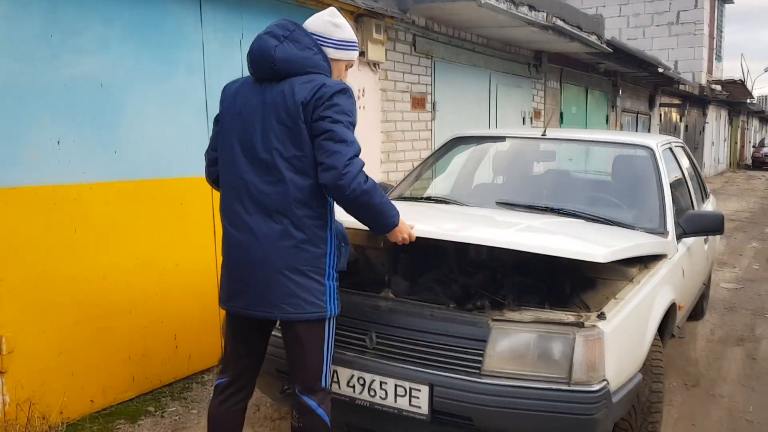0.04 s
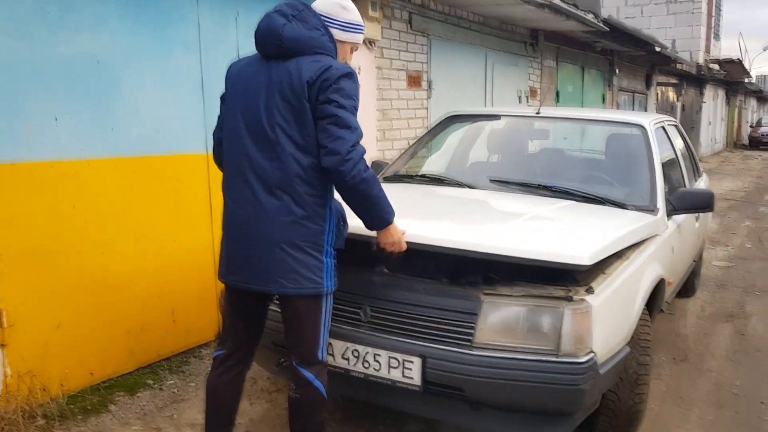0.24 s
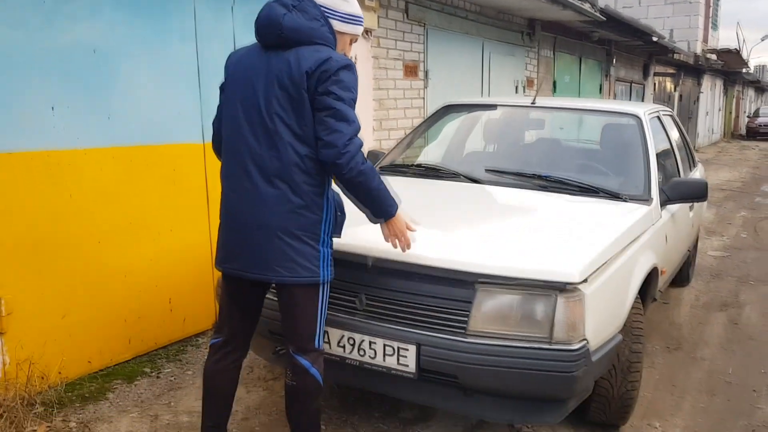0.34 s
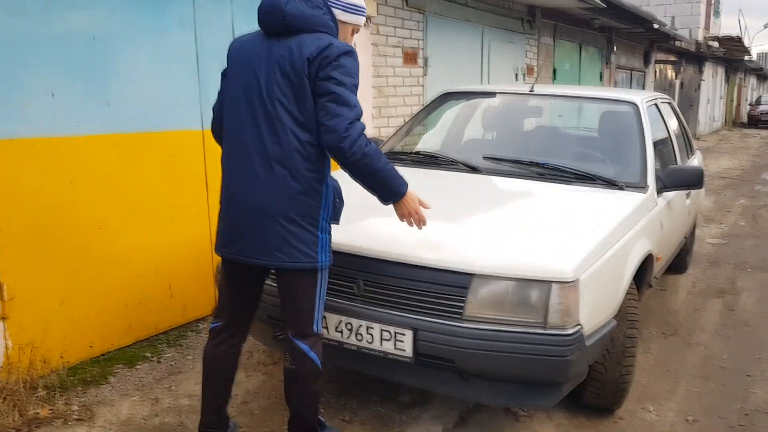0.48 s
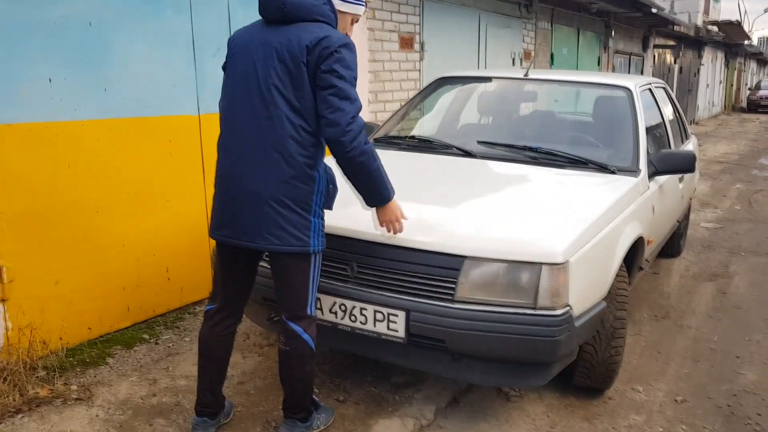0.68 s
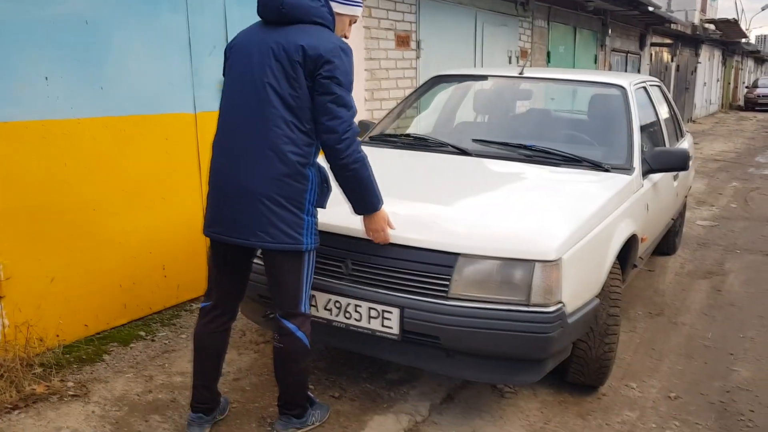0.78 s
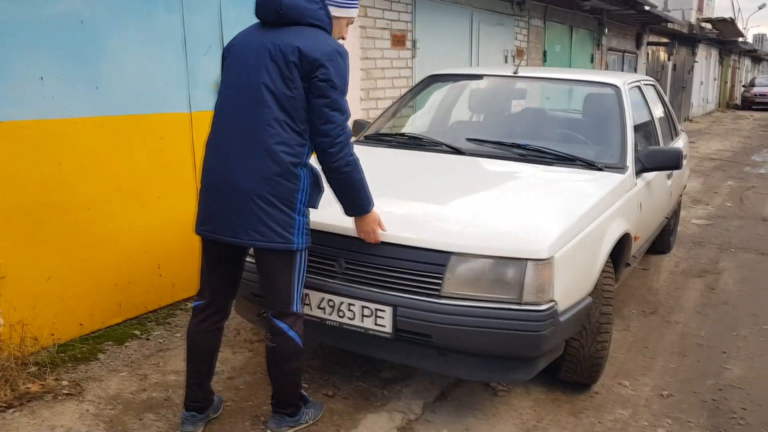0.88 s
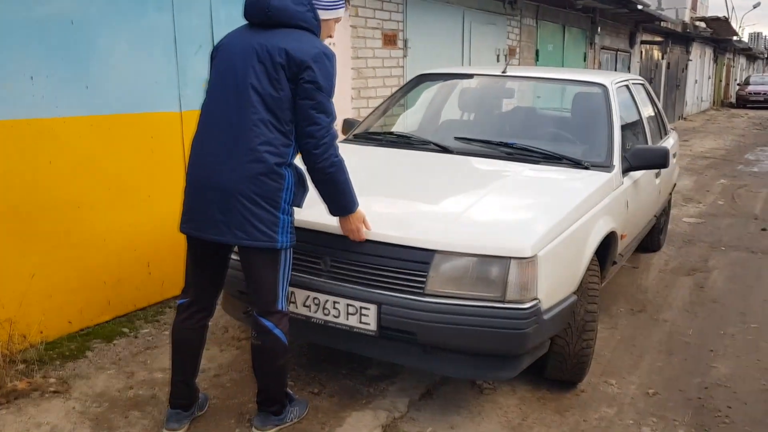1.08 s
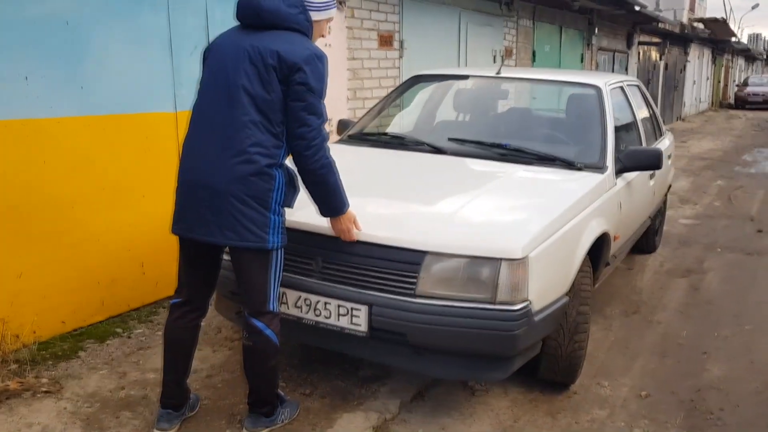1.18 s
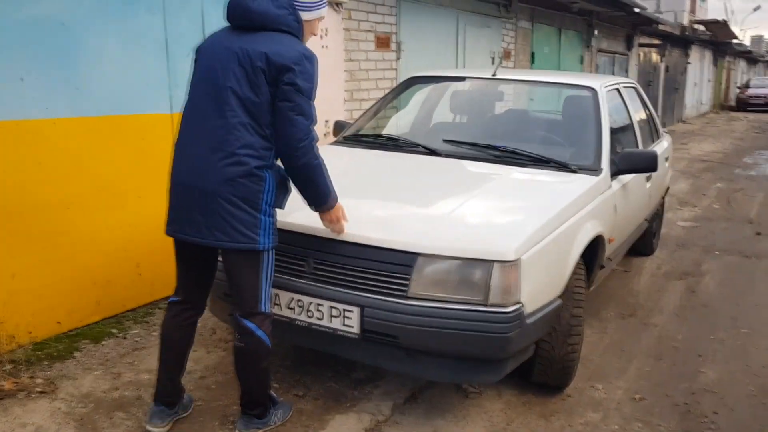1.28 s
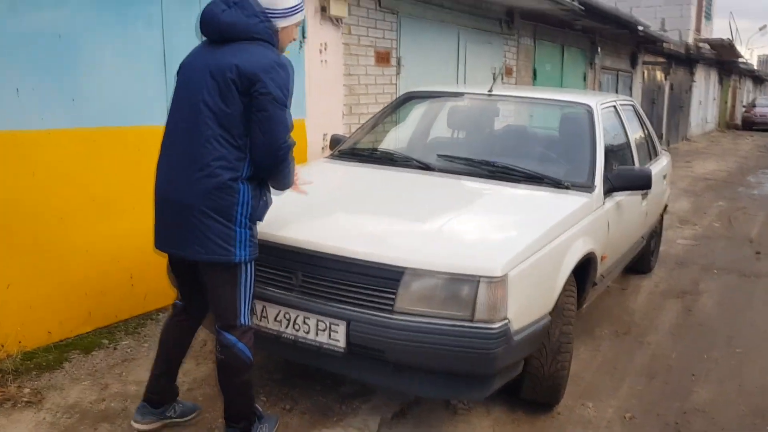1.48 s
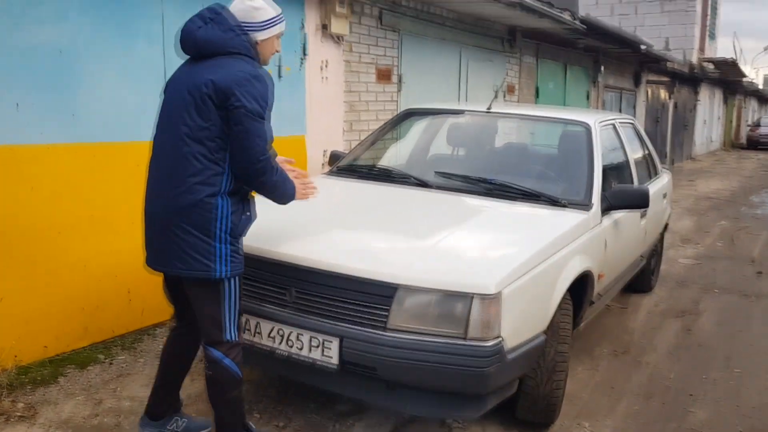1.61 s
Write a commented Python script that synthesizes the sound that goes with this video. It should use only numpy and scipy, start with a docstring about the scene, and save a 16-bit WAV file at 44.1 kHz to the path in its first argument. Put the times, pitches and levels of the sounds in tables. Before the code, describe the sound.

A car hood slams shut outdoors with a metallic clank and a deep, hollow boom

```python
"""Car hood dropped shut

A car hood drops shut in a lane between garage walls. The latch clanks as swelling modes, the rim rattles on
its stops as gritty noise bursts, panel, engine bay and sheet boom as decaying modes, walls add a noise tail.
Before it a gust buffets the microphone ports (lumpy low noise, low swings) and the hinge scrapes faintly (modes
rung by slips). Three soft low thuds (swings too) and a few small ticks follow, over noise as town rumble and hiss."""
import sys
import numpy as np
from scipy import signal
from scipy.io import wavfile

SR = 44100
rng = np.random.default_rng(int(sys.argv[2]) if len(sys.argv) > 2 else 0)


def to_linear_factor(level_db):
    """Convert decibel levels (scalar or array-like) to linear amplitude factors."""
    exponent = np.asarray(level_db, float) / 20
    return 10 ** exponent


def inscribe(sig):
    """Save sig as 16-bit PCM at rate SR to the path in sys.argv[1].

    A 1-D sig is mono; a 2-D sig holds one channel per row.
    Samples are clipped to [-1, 1] before scaling.
    """
    pcm = np.round(np.clip(np.atleast_2d(sig).T, -1, 1) * 32767)
    wavfile.write(sys.argv[1], SR, pcm.astype(np.int16))


N = 72765
T = np.arange(N) / SR

# All dB in the tables are relative; gains below and in the functions add to them.
# Gust on the ports. Each row: time in seconds, level in dB.
GUST_LEVEL = [(0.0, -31.5), (0.032, -26.5), (0.064, -38), (0.084, -25.5), (0.112, -35), (0.128, -25),
              (0.142, -25), (0.166, -22.5), (0.236, -23), (0.362, -45.5), (0.392, -43), (0.42, -42)]
# Gust spectrum. Each row: frequency in Hz, density in dB per Hz.
WIND_SPECTRUM = [(12, -37.5), (20, -18), (54, 2.5), (93, -1), (275, -11.5), (387, -15.5), (605, -35.5),
                 (852, -54.5), (1200, -56), (1560, -84), (2640, -120)]
# Gust at the two ports. Each row: frequency in Hz, left-right correlation.
WIND_LIKENESS = [(40, .6), (180, .05), (1000, 0.16)]
WIND_DB, WIND_CUT_HZ = -3.5, 800
# Strongest eddies of the gust, then three soft low thuds after the slam.
# Each row: centre in seconds, level in dB, frequency in Hz, left minus right in dB.
LOW_SWINGS = [(.015, -30, 220, -8), (.031, -27.5, 461, 5), (.038, -30, 101, -22), (.075, -26, 292, -8),
              (0.088, -23, 108, 1.5), (0.101, -28.5, 420, -5.5), (0.14, -15.5, 80.5, -2),
              (.157, -19, 240, 4), (.187, -26, 149, 1), (.194, -18.5, 298, -2.5), (0.204, -21, 373, 3),
              (.208, -24, 460, 0), (0.218, -18.5, 99, 1), (.241, -16, 113, 2), (.265, -29.5, 288, 11),
              (.281, -25.5, 115, -7.5), (0.305, -36, 133, -7), (0.321, -33, 348, 7), (0.361, -43.5, 414, 6),
              (0.394, -43, 386, 11), (.785, -34.5, 75.1, -3), (0.863, -39, 189, 5), (0.929, -37.5, 78.5, 0)]
SWING_CYCLES = 0.61

# Far town rumble. Each row: time in seconds, level in dB.
RUMBLE_LEVEL = [(0, -52), (1.0, -55), (1.58, -53.5), (1.65, -61.5)]
# Rumble spectrum. Each row: frequency in Hz, density in dB per Hz.
RUMBLE_SPECTRUM = [(15, -30), (25, -6.5), (53, -1.5), (113, -24.5), (266, -18.5), (408, -22.5),
                   (519, -27.5), (595, -39), (1500, -45.5), (1950, -68.5), (3300, -120)]
# Rumble width. Each row: frequency in Hz, left-right correlation.
RUMBLE_LIKENESS = [(60, 0.83), (240, 0.85), (950, 0.33), (3770, -0.08), (15000, -0.01)]
# Hiss. Each row: time in seconds, level in dB.
HISS_LEVEL = [(0.0, -69), (0.266, -72), (0.44, -73), (0.772, -72.5), (0.91, -76), (1.02, -86.5),
              (1.244, -78), (1.474, -74.5), (1.65, -70)]
# Hiss spectrum. Each row: frequency in Hz, density in dB per Hz.
HISS_SPECTRUM = [(530, -38.5), (900, -4.5), (1080, -14), (1620, -7), (2080, -9.5), (12400, -12),
                 (15800, -11.5)]

# Bursts of hinge slips. Each row: centre in seconds, spread in seconds, level in dB.
SCRAPES = [(.12, 0.031, -65.5), (0.125, 0.0045, -59), (0.403, .004, -62)]
# Hinge modes. Each row: frequency in Hz, level in dB, T60 in seconds.
HINGE_MODES = [(1010, -5, 0.027), (1700, -1, 0.012), (2060, 0.5, 0.0088), (2285, -3.5, .03),
               (2700, -3, 0.0099)]

# Latch modes. Each row: frequency in Hz, level in dB, T60 in seconds.
LATCH_MODES = [(665.2, -0.5, .09), (1000, -1.5, .08), (897, -7.5, 0.067), (1245, -9, 0.089),
               (1554, -7, .08), (1810, -3, 0.078), (4190, -15, 0.072), (5437, -16.5, 0.024)]
LATCH_START_S, LATCH_SLIDE_S, LATCH_DB = 0.412, 0.009, -10

# Rim meets latch and stops. Each row: start in seconds, level in dB, brightness in dB per octave above 1 kHz.
CONTACTS = [(0.4122, -35, 1.5), (.419, -23, 1.5), (.424, -24.5, 0.5), (.436, -21, 2.5), (.446, -19.5, 1),
            (.453, -18.5, 1.5), (.462, -17, 1), (.471, -18.5, 0.5), (.478, -22.5, -2), (0.491, -32, -3.5),
            (.505, -32, 1.5), (.518, -32, 1), (.535, -39.5, 1.5), (.578, -54, -2.5)]
# Crash spectrum. Each row: frequency in Hz, density in dB per Hz.
CRASH_SPECTRUM = [(71, -35.5), (120, -0.5), (796, -13.5), (863, -13.5), (1320, -22.5), (1590, -13),
                  (1990, -24), (5380, -26), (15500, -36)]
# Crash decay. Each row: frequency in Hz, T60 in seconds.
CRASH_T60 = [(130, 0.13), (250, .18), (600, .15), (1300, 0.092), (2500, .1), (6000, .08), (15000, 0.061)]
# Crash width. Each row: frequency in Hz, left-right correlation.
CRASH_LIKENESS = [(60, 0.31), (150, 0.8), (380, 0.42), (950, 0.52), (2380, 0.17), (5980, 0.3),
                  (15000, 0.01)]
CRASH_DB, GRIT_DB = 6, 2
SWELL_S, SWELL_HZ = 0.024, 250  # added rise time at this pitch; higher bands are quicker
# Tail from the lane walls. Each row: frequency in Hz, T60 in seconds.
TAIL_T60 = [(130, 0.68), (220, 0.77), (370, 0.8), (700, 0.4), (1300, .33), (2200, 0.41), (6000, .28),
            (15000, 0.088)]
# Tail colour. Each row: frequency in Hz, gain in dB.
TAIL_COLOUR = [(130, -2.5), (220, -1.5), (370, 0), (700, -2.5), (1300, -1.5), (2200, -0.5), (6000, -4),
               (15000, 1.5)]
TAIL_DB, TAIL_RISE_S = -11.5, 0.03
# Far walls return the slam. Each row: start in seconds, level in dB, rise in seconds.
ECHOES = [(.79, -48.5, 0.015), (.815, -48, 0.024), (.86, -51.5, 0.026), (.925, -54.5, 0.025)]
ECHO_T60_S, ECHO_TILT_DB_PER_OCTAVE = 0.237, -3.5

# Higher modes of the sheet. Each row: frequency in Hz, level in dB, T60 in seconds.
PANEL_MODES = [(366, -9, .25), (385, -9, .25), (417, -12, .22), (460, -7, .2), (478, -7, .2), (550, -8, .2),
               (665, -8, .18), (900, -8, .15), (969, -12, .15), (1432, -20, .12), (1744, -20, .12)]
PANEL_DB = -2
# Two close, beating air modes of the engine bay. Each row: frequency in Hz, level in dB, T60 in seconds.
BAY_MODES = [(70.5, .8, .29), (67.5, -22.5, .85)]
BAY_START_S, BAY_BUILD_S = 0.442, 0.027
# Low modes of the sheet. Each row: frequency in Hz, level in dB, T60 in seconds, start in seconds.
BOOM_MODES = [(129.1, -17, 0.37, .45), (171.9, -8, .3, .452), (214.9, -10.5, 0.32, .455),
              (243.6, -16.5, .4, .45), (293.3, -13, .36, .45)]
BOOM_BUILD_S = 0.014

# A small loose metal part ticks. Each row: time in seconds, level in dB, brightness in dB per octave above 1 kHz.
TICKS = [(.79, -57.5, 1), (1.202, -62, -0.5), (1.542, -48.5, -7), (1.5445, -46, -1), (1.547, -49.5, -0.5),
         (1.553, -52, -3), (1.559, -52, -0.5), (1.562, -55.5, 2), (1.572, -62, 2.5), (1.58, -57, -1),
         (1.605, -63.5, 1)]
# Modes of that part. Each row: frequency in Hz, level in dB, T60 in seconds.
TICK_MODES = [(590, 2.5, 0.019), (1030, -0.5, 0.021), (1535, -5, 0.034), (1755, -3.5, 0.029),
              (2600, -18, 0.011), (3353, -9, 0.014), (4850, -4.5, .018), (5730, -5, 0.011),
              (8300, -10, .01), (4150, -4, 0.0027), (11100, -5, .002)]

LEFT_DB = 0.35  # left up, right down by this
OVERLOAD = 2.5


def rms_one(x):
    """Scale to rms 1."""
    return x / np.sqrt(np.mean(x ** 2) + 1e-20)


def in_time(rows):
    """A (s, dB) curve as gain per sample."""
    s, db = np.transpose(rows)
    return to_linear_factor(np.interp(T, s, db))


def at_hz(points, hz):
    """Read a spectrum table on a log frequency axis."""
    table_hz, value = np.transpose(points)
    return np.interp(np.log(hz), np.log(table_hz), value)


def drift(rate_hz):
    """Random drift of rms 1: noise through two equal one-pole low-passes."""
    r = np.exp(-2 * np.pi * rate_hz / SR)
    noise = rng.standard_normal(N + SR)
    return rms_one(signal.lfilter([1], [1, -2 * r, r * r], noise)[SR:])


def ring(clicks, hz, t60_s):
    """Two-pole resonator: a unit click starts a decaying sine of height 1."""
    r = to_linear_factor(-60 / (t60_s * SR))
    w = 2 * np.pi * hz / SR
    return signal.lfilter([0, np.sin(w)], [1, -2 * r * np.cos(w), r * r], clicks + 1e-18)


def dying(start_s, t60_s, rise_s):
    """Envelope that rises from its start and decays with T60."""
    u = np.maximum(T - start_s, 0)
    return (1 - np.exp(-(u / rise_s) ** 2)) * to_linear_factor(-60 * u / t60_s)


def bands(spectrum, likeness):
    """Half-octave bands of stereo noise over the span of a spectrum; together rms 1."""
    low_hz = spectrum[0][0]
    high_hz = min(spectrum[-1][0], 0.45 * SR)
    edges = np.geomspace(low_hz, high_hz, int(2 * np.log2(high_hz / low_hz)) + 2)
    white = rng.standard_normal((2, 2, N + 4000))
    out = []
    for k, (low, high) in enumerate(zip(edges, edges[1:])):
        sos = signal.butter(2, [low, high], "band", fs=SR, output="sos")
        mid, side = signal.sosfilt(sos, white[k % 2])[:, 4000:]  # drop the filter's start
        hz = np.sqrt(low * high)
        alike = np.clip(at_hz(likeness, hz), -1, 1)
        stereo = np.sqrt(1 + alike) * mid + np.sqrt(1 - alike) * side * [[1], [-1]]
        out.append((hz, to_linear_factor(at_hz(spectrum, hz)) * stereo))
    total = np.sqrt(sum(np.mean(x ** 2) for hz, x in out))
    return [(hz, x / total) for hz, x in out]


def strike(times_s, gains, modes, spread_db):
    """Clicks ring a table of modes, with new strengths per mode, click and side."""
    out = np.zeros((2, N))
    index = (np.asarray(times_s) * SR).astype(int)
    for hz, db, t60_s in modes:
        clicks = np.zeros((2, N))
        luck = rng.normal(0, 1, (len(times_s), 3))
        sign = np.sign(luck[:, 2])
        for side in range(2):
            np.add.at(clicks[side], index, gains * sign * to_linear_factor(db + spread_db * luck[:, side]))
        out += ring(clicks, hz, t60_s)
    return out


def gust():
    """Turbulence at the ports: low noise whose lumps differ per port and deepen with pitch."""
    lumps = np.array([drift(42), drift(35)])
    noise = 0
    for hz, x in bands(WIND_SPECTRUM, WIND_LIKENESS):
        depth_db = 2.0 + 1.1 * np.log2(hz / 40)
        noise = noise + x * to_linear_factor(depth_db * lumps)
    noise = signal.sosfilt(signal.butter(3, WIND_CUT_HZ, fs=SR, output="sos"), noise)
    blowing = T < GUST_LEVEL[-1][0]
    return to_linear_factor(WIND_DB) * in_time(GUST_LEVEL) * blowing * rms_one(noise)


def rumble():
    """Far town rumble: low noise whose bands drift slowly in level."""
    noise = sum(x * to_linear_factor(1.5 * drift(6.6)) for hz, x in bands(RUMBLE_SPECTRUM, RUMBLE_LIKENESS))
    return in_time(RUMBLE_LEVEL) * noise


def hiss():
    """Nearly uncorrelated noise whose level sags for a while."""
    noise = sum(x for hz, x in bands(HISS_SPECTRUM, [(900, 0.1), (15000, 0.0)]))
    return in_time(HISS_LEVEL) * to_linear_factor(7.5) * noise


def low_swings():
    """Short low swings under a Gaussian, unlike left and right: gust eddies and late soft thuds."""
    out = np.zeros((2, N))
    for (s, db, hz, pan_db), luck in zip(LOW_SWINGS, rng.normal(0, 1, (len(LOW_SWINGS), 5))):
        cycles = (T - s) * hz * (1 + 0.13 * luck[:2, None])
        phase = 2 * luck[4] + min(hz / 160, 2) * luck[2:4, None]  # sides agree less at higher pitch
        gain = to_linear_factor(db + pan_db * np.array([[0.5], [-0.5]]))
        out += gain * np.exp(-(cycles / SWING_CYCLES) ** 2) * np.cos(2 * np.pi * cycles + phase)
    return out


def hinge():
    """Uneven slips ring the hinge modes as the hood swings down."""
    out = 0
    for (s, spread_s, db), count in zip(SCRAPES, (90, 12, 12)):
        slips_s = np.clip(rng.normal(s, spread_s, count), 0, 1)
        out = out + to_linear_factor(db) * strike(slips_s, 0.97, HINGE_MODES, spread_db=3.5)
    return out


def latch():
    """The striker forces the catch aside; its modes swell over the short slide and ring out."""
    shared_phase = rng.uniform(0, 2 * np.pi, (len(LATCH_MODES), 1))
    phases = shared_phase + 0.5 * rng.normal(0, 1, (len(LATCH_MODES), 2))
    out = 0
    for (hz, db, t60_s), phase in zip(LATCH_MODES, phases):
        level = to_linear_factor(LATCH_DB + db + 3.2 * drift(90))
        envelope = dying(LATCH_START_S, t60_s, LATCH_SLIDE_S)
        out = out + level * envelope * np.sin(2 * np.pi * hz * T + phase[:, None])
    return out


def crash():
    """Each contact bursts in gritty noise that dies by band; near and far walls return it."""
    out, shared = 0, drift(360)
    for hz, noise in bands(CRASH_SPECTRUM, CRASH_LIKENESS):
        octaves = max(np.log2(hz / 1000), 0)
        grit = to_linear_factor(GRIT_DB * (0.4 * shared + 0.6 * drift(210)))
        rise_s = 0.00029 + SWELL_S * (SWELL_HZ / hz) ** 2
        tail_gain = to_linear_factor(TAIL_DB + at_hz(TAIL_COLOUR, hz))
        power = 0
        for s, db, bright_db in CONTACTS:
            direct = grit * dying(s, at_hz(CRASH_T60, hz), rise_s)
            near = tail_gain * dying(s, at_hz(TAIL_T60, hz), TAIL_RISE_S)
            power = power + to_linear_factor(db + bright_db * octaves) ** 2 * (direct ** 2 + near ** 2)
        for s, db, echo_rise_s in ECHOES:
            far = to_linear_factor(db + ECHO_TILT_DB_PER_OCTAVE * octaves) * dying(s, ECHO_T60_S, echo_rise_s)
            power = power + far ** 2
        out = out + noise * np.sqrt(power)
    return to_linear_factor(CRASH_DB) * out


def panel():
    """Every rim contact rings the higher modes of the sheet."""
    s, db, _ = np.transpose(CONTACTS)
    return to_linear_factor(PANEL_DB) * strike(s, to_linear_factor(db), PANEL_MODES, spread_db=3.5)


def engine_bay():
    """Enclosed air booms in two close modes that beat."""
    out = 0
    for hz, db, t60_s in BAY_MODES:
        tone = np.sin(2 * np.pi * hz * (T - BAY_START_S))
        out = out + to_linear_factor(db) * dying(BAY_START_S, t60_s, BAY_BUILD_S) * tone
    return out


def sheet_boom():
    """The sheet bends slowly into its low modes, which swell, waver and die."""
    out = 0
    for hz, db, t60_s, s in BOOM_MODES:
        tone = np.sin(2 * np.pi * hz * (T - s))
        out = out + to_linear_factor(db + 2.5 * drift(30)) * dying(s, t60_s, BOOM_BUILD_S) * tone
    return out


def ticks():
    """Each tick rings the modes of the loose part, duller or brighter."""
    s, db, bright_db = np.transpose(TICKS)
    out = 0
    for mode in TICK_MODES:
        octaves = max(np.log2(mode[0] / 1000), 0)
        out = out + strike(s, to_linear_factor(db + bright_db * octaves), [mode], spread_db=3.5)
    return out


def scene():
    """All sources, the car a little to the left."""
    car = hinge() + latch() + crash() + panel() + engine_bay() + sheet_boom() + ticks()
    return gust() + rumble() + hiss() + low_swings() + car * to_linear_factor([[LEFT_DB], [-LEFT_DB]])


def band_limit(x):
    """A steep low-pass at the top of the band."""
    return signal.sosfilt(signal.butter(12, 16660, fs=SR, output="sos"), x)


def record(dry):
    """Soft saturation rounds the loudest peaks."""
    mix = OVERLOAD * np.tanh(dry / OVERLOAD)
    return band_limit(mix)


dry = scene()
out = record(dry)
inscribe(out)
```